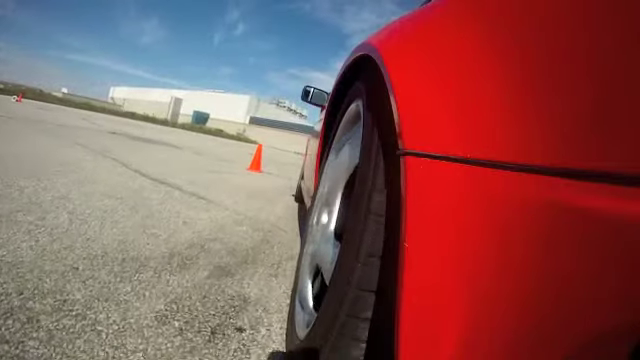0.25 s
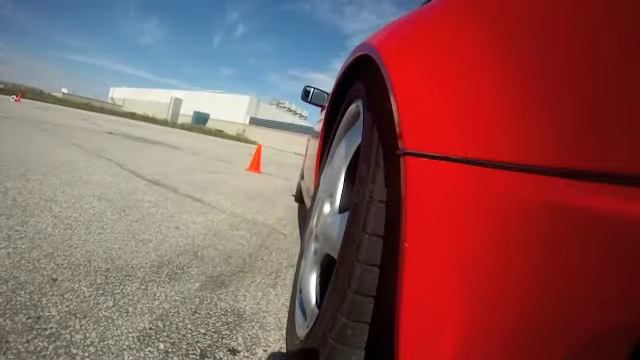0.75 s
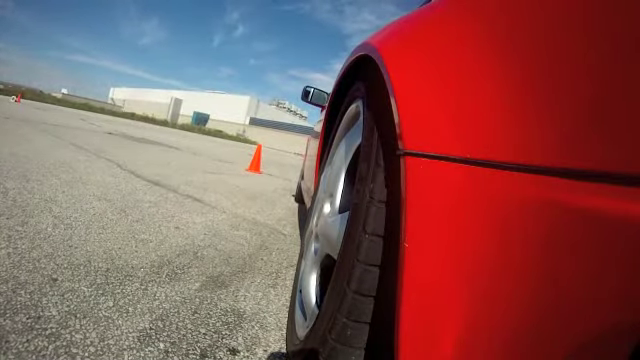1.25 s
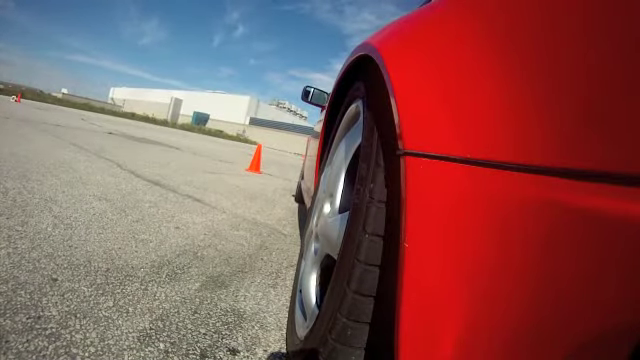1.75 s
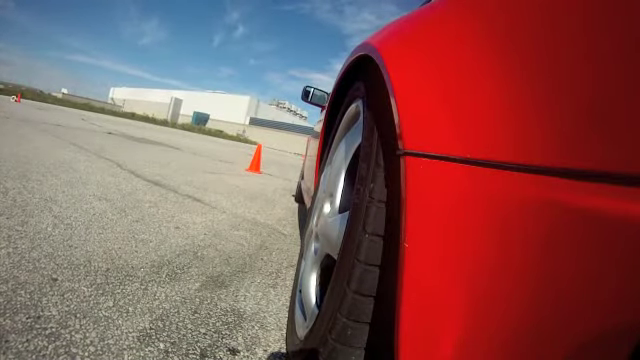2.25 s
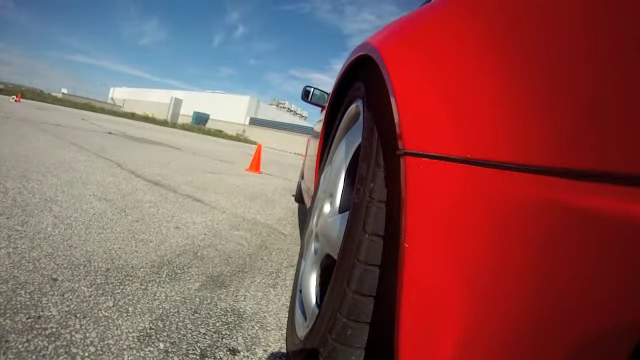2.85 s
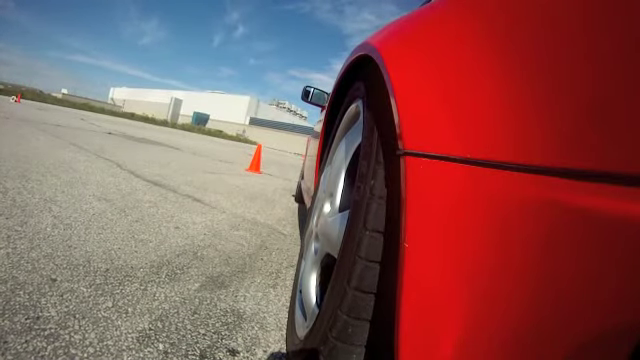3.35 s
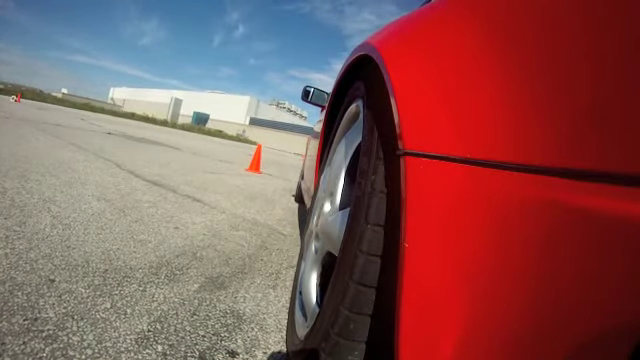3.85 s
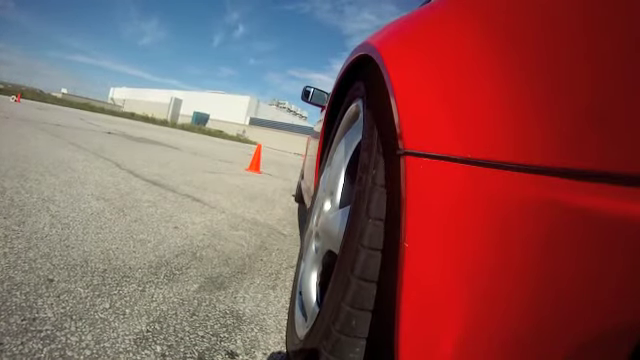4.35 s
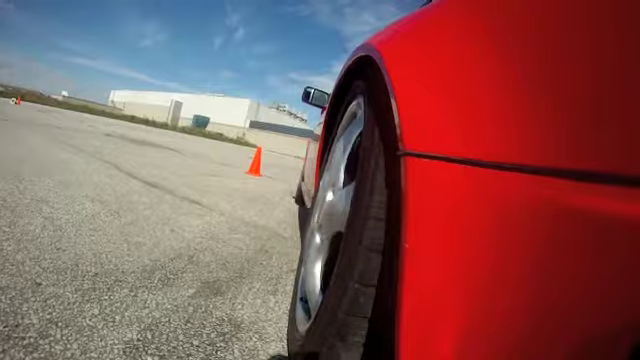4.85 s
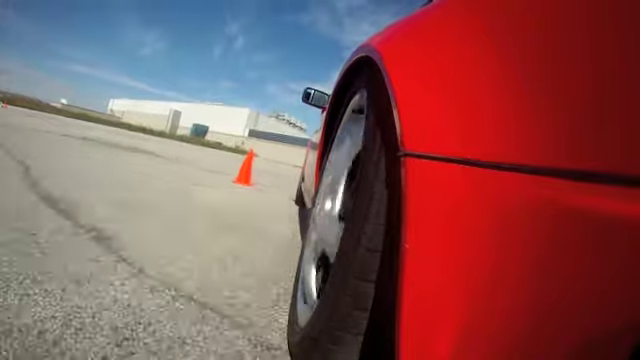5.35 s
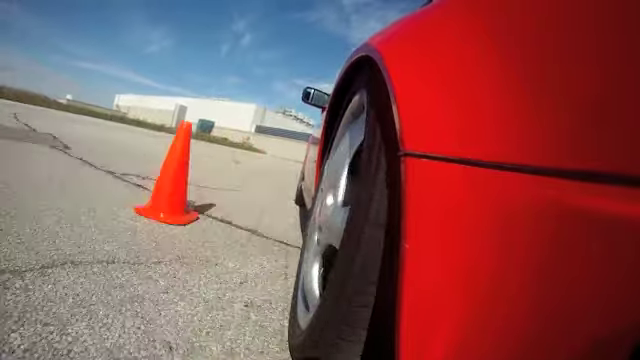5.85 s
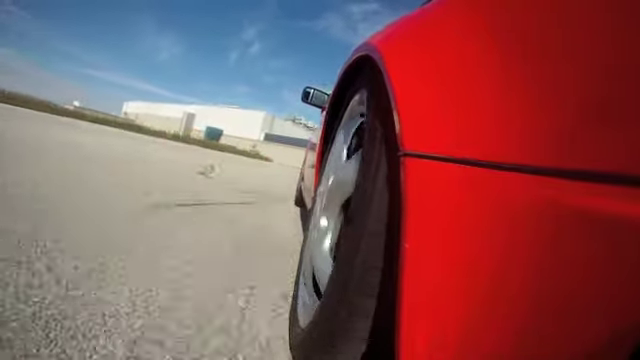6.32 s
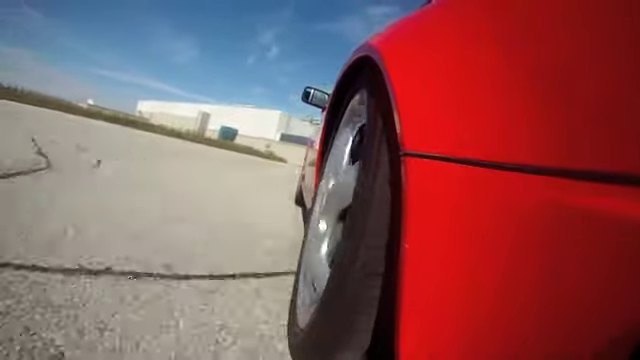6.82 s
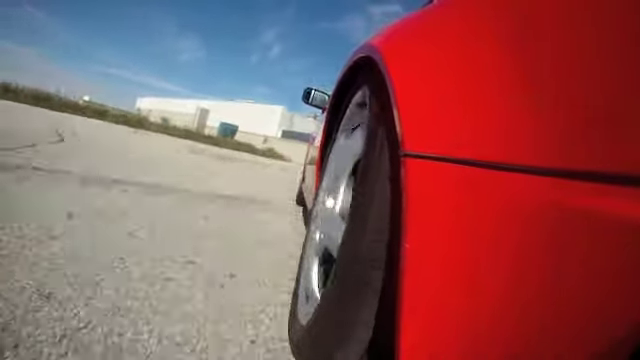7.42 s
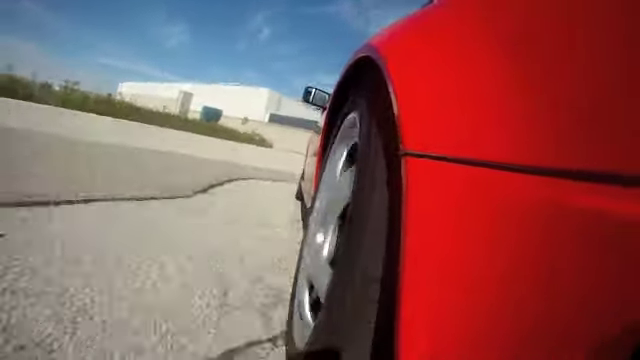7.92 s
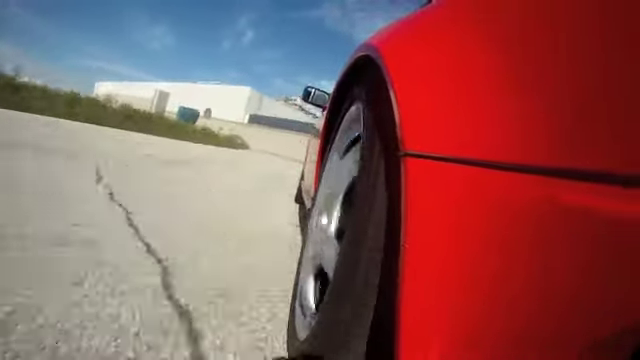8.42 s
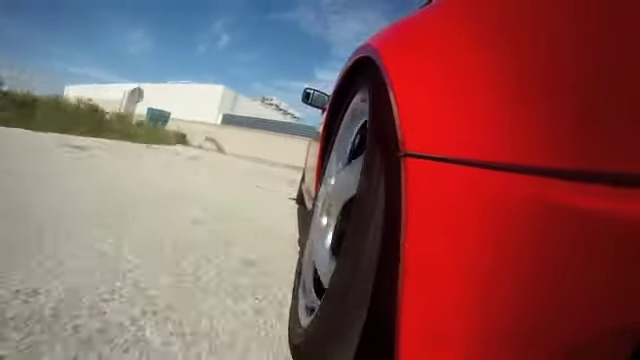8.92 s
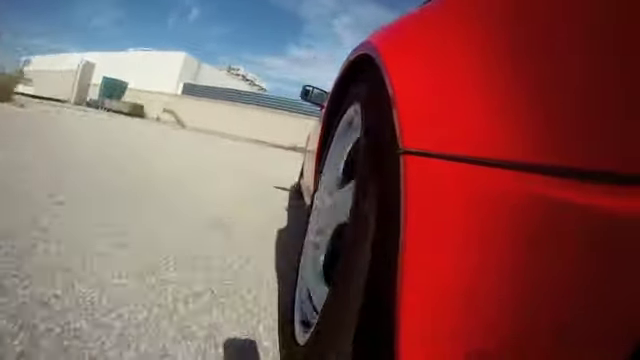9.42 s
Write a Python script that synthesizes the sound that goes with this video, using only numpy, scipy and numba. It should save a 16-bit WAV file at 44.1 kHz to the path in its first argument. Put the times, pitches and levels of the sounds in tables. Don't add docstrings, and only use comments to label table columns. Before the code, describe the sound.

From 0 to 3.5 s a six-cylinder car engine idles steadily, a low lumpy hum under constant valve and fan hiss, with a faint thump near 1.2 s. Around 3.6 to 4.2 s a first throttle blip swells and falls with several heavy muffler thumps; a second, with the hardest thump, comes at 4.4 s. At 4.8 s the engine surges and the car pulls away with a low growl, sags near 5.7 s, then climbs steadily from 6 s into a loud rasping, singing roar with fan whine, peaking about 7.7 s. It lifts off, pitch falling fast with hiss and boom until 8.4 s. Paving knocks and loose-panel rattle come at 5.1, 6.2, 8.3 to 8.4, 9.3 and 9.6 s. From 8.5 s it pulls again at middle revs, easing rougher after 9.2 s. Close, sealed body-mounted microphone outdoors: muffled, compressed, with gritty mirrored treble.

```python
import sys
import numpy as np
from scipy import signal
from scipy.fft import rfft, irfft, next_fast_len
from scipy.io import wavfile
from scipy.ndimage import uniform_filter1d, map_coordinates
from numba import njit

SR = 44100
rng = np.random.default_rng(int(sys.argv[2]) if len(sys.argv) > 2 else 0)


def gain_from_db(level_db):
    decades = np.asarray(level_db, float) / 20
    return 10 ** decades


def unload_wav(signal):
    wavfile.write(
        sys.argv[1],
        SR,
        np.round(np.clip(np.atleast_2d(signal).T, -1, 1) * 32767).astype(np.int16),
    )


N = 426888
TIME = np.arange(N) / SR


def unit(x):
    return x / np.sqrt(np.mean(x ** 2) + 1e-20)


def curves(rows):
    seconds, *columns = np.transpose(rows)
    return [np.interp(TIME, seconds, column) for column in columns]


def wobble(rate):
    coarse = np.arange(0, N + 64, 64)
    knots = rng.standard_normal(int(N * rate / SR) + 4)
    return np.interp(np.arange(N), coarse, map_coordinates(knots, [coarse * rate / SR]))


def filtered(x, response):
    size = next_fast_len(N + SR // 2)
    return irfft(rfft(x, size) * response(np.fft.rfftfreq(size, 1 / SR)), size)[:N]


def noise(spectrum):
    points_hz, db = np.transpose(spectrum)
    colour = lambda hz: gain_from_db(np.interp(np.log(hz + 1), np.log(points_hz), db))
    return unit(filtered(rng.standard_normal(N), colour))


def ringing(x, modes, soft_hz):
    def body(f):
        total = 0
        for k, (centre, width, db) in enumerate(modes):
            total = total + (-1) ** k * gain_from_db(db) * 1j * f * width / (centre ** 2 - f * f + 1j * f * width)
        return total / (1 + 1j * f / soft_hz) ** 2
    return filtered(x, body)


def levelled(x, seconds):
    return x / np.sqrt(np.abs(uniform_filter1d(x ** 2, int(seconds * SR))) + 1e-20)


def blows(rows, db):
    return np.bincount(np.round(np.array(rows)[:, 0] * SR).astype(int), gain_from_db(db), N)


def patchy(x, depth_db):
    z = signal.stft(x, nperseg=512)[2]
    field = uniform_filter1d(rng.standard_normal(z.shape), size=4, axis=0)
    field = uniform_filter1d(field, size=16, axis=1)
    return signal.istft(z * gain_from_db(depth_db * unit(field)), nperseg=512)[1][:N]


def mapped(on, off, speed_hz, pedal):
    def read(rows):
        speeds, *columns = np.transpose(rows)
        return np.array([np.interp(speed_hz, speeds, column) for column in columns])
    return pedal * read(on) + (1 - pedal) * read(off)


# time in seconds, engine cycles a second.
ENGINE_SPEED = [(0, 8.25), (2.3, 8.45), (3.45, 8.25), (3.69, 10.85), (4.23, 8.68), (4.41, 11.3),
                (4.83, 19.45), (5.25, 17.93), (5.45, 17.77), (5.75, 15.04), (5.95, 19.1), (6.65, 28.7),
                (7.5, 42.3), (7.7, 48.6), (8.0, 39.2), (8.45, 28.3), (8.8, 27.6), (9.68, 26.1)]
# time in seconds, pedal from 0 to 1.
PEDAL_POSITION = [(0, 0.46), (.3, 0.38), (2.0, 0.27), (2.25, 0), (2.7, 0.27), (4.4, 0.63), (4.9, 0.75),
                  (5.3, 1), (5.75, 0.58), (6.1, 0.89), (7.72, 0.9), (7.87, 0), (8.2, 0.51), (8.5, 0.55),
                  (8.65, 0.84), (9.0, 0.92), (9.2, 0.48), (9.68, 0.43)]
# start in seconds, surge in cycles a second, rise in seconds,
# fall in seconds, how far the throttle shuts in the fall from 0 to 1.
STABS = [
    (3.75, 9, .12, .36, 1),
    (4.41, 9.6, .18, .24, .8),
    (4.83, 2.5, .12, .25, 0),
    (8.45, -1.5, .2, .11, 0),
]


def driver():
    speed_hz, = curves(ENGINE_SPEED)
    pedal, = curves(PEDAL_POSITION)
    for start, surge, rise, fall, shut in STABS:
        up = np.clip((TIME - start) / rise, 0, 1)
        down = np.clip((TIME - start - rise) / fall, 0, 1)
        speed_hz = speed_hz + surge * (np.sin(np.pi / 2 * up) - down)
        pedal = np.where((up > 0) & (up < 1) & (surge > 0), .84, pedal)
        pedal = pedal * np.where((down > 0) & (down < 1), 1 - shut, 1)
    flywheel_s, foot_s = .07, .05
    speed_hz = uniform_filter1d(speed_hz, size=int(flywheel_s * SR))
    return speed_hz, np.clip(uniform_filter1d(pedal, size=int(foot_s * SR)), 0, 1)


def slowing(speed_hz):
    return np.clip(-uniform_filter1d(np.gradient(speed_hz) * SR, size=4000) / 22, 0, 1)


def firings(cycles, rough, cylinders):
    count = np.arange(1, int(6 * cycles[-1]))
    size, late = np.array(cylinders)[count % 6].T
    late_chance, size_chance = rng.standard_normal((2, len(count)))
    rough = rough[np.searchsorted(6 * cycles, count)]
    at = np.searchsorted(6 * cycles, count + late + 0.13 * rough * late_chance)
    return np.bincount(np.minimum(at, N - 1), size * np.exp(rough * size_chance), N)


# time in seconds, size scatter of the firings, mix from idling (0) to pulling (1).
BURNING = [(0, .12, 0), (3.4, .12, 0), (3.7, .28, .3), (4.4, .22, .4), (4.9, .07, 1), (5.3, .04, 1),
           (5.8, .07, 1), (6.4, .06, 1), (7.6, .05, 1), (7.85, .16, 1), (8.5, .15, 1), (8.8, .07, 1),
           (9.05, .1, 1), (9.2, .28, .8), (9.68, .22, .8)]
IDLING = [(0.3, 0.2), (0.64, -0.138), (0.79, 0.093), (1.15, -0.196), (0.39, 0.001), (1.5, -0.2)]
UNDER_THROTTLE = [(0.98, 0.144), (0.56, -0.264), (0.86, 0.107), (-0.83, 0.058), (-0.76, 0.221),
                  (0.91, 0.255)]


def gas_pulses(cycles):
    rough, throttle = curves(BURNING)
    idling = firings(cycles, rough, IDLING)
    pulling = firings(cycles, rough, UNDER_THROTTLE)
    return (1 - throttle) * idling + throttle * pulling, rough, throttle


# cycles a second, firing tone in dB, bank tone in dB, body shake in dB.
TONES_PEDAL_DOWN = [(8.3, -15.5, -45, -17), (11.2, -10.5, -21, -24), (14.9, -29, -34, -44),
                    (18.3, -19, -24.5, -31), (20.4, -13.5, -24.5, -37.5), (26.8, -14.5, -24.5, -29.5),
                    (35.4, -17, -20, -37.5), (47, -17, -16.5, -31)]
# cycles a second, firing tone in dB, bank tone in dB, body shake in dB.
TONES_LIFTED = [(8.4, -24.5, -44, -29), (10.7, -31.5, -23, -23), (15, -16, -29, -23), (17.8, -32, -36, -27),
                (20.6, -41, -22, -14), (26, -32, -18, -11.5), (33.8, -44.5, -18.5, -20),
                (47, -29.5, -17.5, -26)]
# frequency in Hz, level in dB per Hz.
SHAKE_COLOUR = [(15, 0), (28, -13), (42, -1), (65, 0.5), (120, -3), (250, -17.5), (600, -29), (800, -105)]


def tones_and_shake(turn, speed_hz, pedal, throttle):
    firing_db, bank_db, shake_db = mapped(TONES_PEDAL_DOWN, TONES_LIFTED, speed_hz, pedal)
    beat = turn - .1 + .06 * wobble(8)
    tones = gain_from_db(firing_db + 3.5) * np.cos(6 * beat)
    overtones = gain_from_db(-6) * np.cos(9 * beat) + gain_from_db(-12) * np.cos(12 * beat)
    tones += (1 - throttle) * gain_from_db(firing_db) * overtones
    tones += gain_from_db(bank_db + 3.5) * np.sin(3 * turn + .2 * wobble(6))
    second_db = bank_db - 14 + 12 * slowing(speed_hz)
    tones += throttle * gain_from_db(second_db) * np.sin(4 * turn + .3 * wobble(6))
    return tones + gain_from_db(shake_db + 2 * wobble(7)) * noise(SHAKE_COLOUR)


def alternator(throttle):
    return (1 - throttle) * gain_from_db(-55) * np.sin(2 * np.pi * 945 * TIME + 1.3 * wobble(15))


# frequency in Hz, width in Hz, level in dB.
MUFFLER_MODES = [(79.4, 4.7, -5.5), (128.8, 26.8, 4.5), (159.1, 30.2, 4.5), (184.6, 14.4, -6)]


def muffler_boom(pulses, boom_db):
    return gain_from_db(boom_db - 4.0) * levelled(ringing(pulses, MUFFLER_MODES, soft_hz=407), 0.53)


# frequency in Hz, width in Hz, level in dB.
HEADER_MODES = [(178.7, 55, 6), (266.4, 14.6, 11.5), (316, 37, 1.5)]


def header_pipes(pulses, header_db, throttle):
    level = gain_from_db(header_db - 9.0 + 1.8 * throttle)
    return level * levelled(ringing(pulses, HEADER_MODES, soft_hz=590), 0.19)


# frequency in Hz, width in Hz, level in dB.
SHELL_MODES = [(372.6, 134, -3.5), (431, 42, 8), (486, 58.8, 8.5), (569.5, 88, 2.5), (633, 34.7, -4.5)]


def shell_rasp(shaken, rasp_db, throttle):
    level = gain_from_db(rasp_db - 0.18 - 2.5 * throttle)
    return level * levelled(ringing(shaken, SHELL_MODES, soft_hz=810), 0.099)


# time in seconds, swell in dB, length in seconds.
SLACK = [
    (4.495, 11, 0.061),
    (4.978, 4, .1),
    (5.99, 10.5, .12),
    (8.046, 5, .12),
]
# frequency in Hz, width in Hz, level in dB.
PANEL_MODES = [(979, 91, 12), (1183, 90, 2), (1397, 44, 6)]


def panel_buzz(shaken, buzz_db):
    for start, swell_db, length in SLACK:
        buzz_db = buzz_db + swell_db * np.exp(-((TIME - start) / length) ** 2)
    driven = ringing(shaken, [(1300, 660, 0)], soft_hz=4000)
    return gain_from_db(buzz_db) * levelled(ringing(driven, PANEL_MODES, soft_hz=3030), 0.34)


# frequency in Hz, width in Hz, level in dB.
CASE_MODES = [(1640, 150, 1.5), (2490, 260, -1), (3050, 260, 1)]


def case_ring(shaken, machinery_db, speed_hz):
    level_db = machinery_db - 5 + 0.48 * (speed_hz - 39)
    return gain_from_db(level_db) * levelled(ringing(shaken, CASE_MODES, soft_hz=8000), 0.27)


# frequency in Hz, level in dB per Hz.
HISS_COLOUR = [(380, -26), (650, -7), (700, -2.5), (820, -11), (926, -5.5), (1060, -7.5), (1230, -4.5),
               (1460, -4), (1740, -7), (2460, -4), (2960, -2), (3630, -7), (4290, -15.5), (5080, -8.5),
               (6000, -26.5), (7800, -67), (13200, -120)]


def valve_hiss(turn, machinery_db):
    gate = 1 + .2 * np.cos(6 * turn) + .08 * np.cos(2 * turn + 1) + .12 * np.cos(turn)
    flutter_db = .7 * wobble(5.5)
    hiss = unit(gate * patchy(noise(HISS_COLOUR), depth_db=1.0))
    return gain_from_db(machinery_db + 2.5 + flutter_db) * hiss


# time in seconds, peak in dB.
HEAVY_FIRINGS = [(1.21, -22), (3.546, -20), (3.595, -2.5), (3.658, -9), (3.72, -2), (3.741, -5),
                 (3.847, -1), (4.047, -4), (4.204, -4), (4.406, 9)]


def thumps():
    pushes = blows(HEAVY_FIRINGS, np.array(HEAVY_FIRINGS)[:, 1] + 43)
    return ringing(pushes, [(111, 38, 0)], soft_hz=169)


def fan_whine(turn, machinery_db, speed_hz, throttle):
    level_db = machinery_db - 6.5 - 9 * slowing(speed_hz) + 3 * wobble(4)
    blades = np.sin(28 * turn + .7 * wobble(12)) + .7 * np.sin(34 * turn + wobble(12))
    strength = np.interp(speed_hz, [28, 32.8, 43, 46], [0, 0.28, 1.8, 0.39])
    return throttle * gain_from_db(level_db) * blades * strength


# frequency in Hz, width in Hz, level in dB.
TAILPIPE_MODES = [(190.6, 14, 9.5), (221, 52, -1.5)]


def tailpipe_boom(pulses, boom_db, speed_hz, throttle):
    level = throttle * gain_from_db(boom_db - 4.0 - 0.86 * np.abs(speed_hz - 18))
    return level * levelled(ringing(pulses, TAILPIPE_MODES, soft_hz=615), 0.2)


SINGING_ORDERS = [9, 13, 15, 16, 18, 19, 22, 25, 28, 30, 31, 32, 33]
SINGING_LEVELS = [2.5, -3, -3.5, -7, -3.5, -6, -8, -6.5, -4.5, -5, -4, -6, -5]
# frequency in Hz, width in Hz, level in dB.
SINGING_MODES = [(575, 207, 1)]


def shell_singing(turn, speed_hz, pedal, rasp_db, throttle):
    song = np.zeros(N)
    for order, db in zip(SINGING_ORDERS, SINGING_LEVELS):
        song += gain_from_db(db) * np.sin(order * turn + order ** 2 + .6 * wobble(5))
    song *= gain_from_db(-9 * (1.5 - pedal) + 3 * (speed_hz < 19.5))
    song = filtered(song, lambda hz: 1 / (1 + (hz / 640) ** 20))
    return throttle * gain_from_db(rasp_db + 2.0) * ringing(song, SINGING_MODES, soft_hz=930)


# time in seconds, peak in dB, panel ring in dB.
JOINTS = [(5.07, -18, -31), (5.167, -24, -30), (6.089, -23, -24), (6.277, -11, -41), (8.306, -15, -25),
          (8.339, -12.5, -23), (8.372, -12.5, -22), (8.405, -18.5, -16), (8.44, -17.5, -13.5),
          (9.222, -16.5, -24), (9.306, -19, -8.5), (9.61, -16, -18)]


def knocks():
    knock_db, ring_db = np.array(JOINTS)[:, 1:].T
    knock = ringing(blows(JOINTS, knock_db + 43.0), SHELL_MODES, soft_hz=1530)
    return knock + ringing(blows(JOINTS, knock_db + ring_db + 42.5), PANEL_MODES, soft_hz=3000)


# cycles a second, muffler boom in dB, header pipes in dB, shell rasp in dB, panel buzz in dB.
PIPES_PEDAL_DOWN = [(8.45, -13, -39, -30.5, -50), (10.5, -21, -28, -38, -56), (16.2, -14, -21, -22.5, -47),
                    (16.67, -15, -36.5, -17.5, -41.5), (20.4, -19.5, -24, -18.5, -45),
                    (26.9, -34.5, -14.5, -21.5, -44), (35.6, -64, -13.5, -16.5, -36),
                    (44.5, -30, -21, -18, -40)]
# cycles a second, muffler boom in dB, header pipes in dB, shell rasp in dB,
# panel buzz in dB.
PIPES_LIFTED = [(8.3, -20, -78, -36, -70.5), (11, -15.5, -57, -25.5, -83), (15, -31, -18, -28.5, -84),
                (18.3, -22, -46, -32.5, -69), (22.1, -22.5, -45, -30, -51), (26, -8.5, -40, -28, -40.5),
                (35, -3.5, -36.5, -25.5, -35), (46.2, -27, -9.5, -17, -42)]
# time in seconds, level in dB.
MACHINERY_LEVEL = [(0.0, -39), (0.05, -40), (2.42, -42.5), (2.67, -41), (3.64, -42), (3.8, -44),
                   (3.96, -38), (4.39, -39), (4.42, -41), (4.66, -36.5), (5.77, -42.5), (5.96, -37),
                   (6.47, -40), (7.68, -29.5), (8.68, -34.5), (8.9, -40), (9.27, -35), (9.68, -35.5)]


def engine():
    speed_hz, pedal = driver()
    cycles = np.cumsum(speed_hz) / SR
    turn = 2 * np.pi * cycles
    pulses, rough, throttle = gas_pulses(cycles)
    boom_db, header_db, rasp_db, buzz_db = mapped(PIPES_PEDAL_DOWN, PIPES_LIFTED, speed_hz, pedal)
    machinery_db, = curves(MACHINERY_LEVEL)
    shaken = levelled(pulses, .3) + (7 - 3 * throttle) * rough * rng.standard_normal(N)
    sound = tones_and_shake(turn, speed_hz, pedal, throttle) + alternator(throttle)
    sound += muffler_boom(pulses, boom_db)
    sound += header_pipes(pulses, header_db, throttle)
    sound += shell_rasp(shaken, rasp_db, throttle)
    sound += panel_buzz(shaken, buzz_db)
    sound += case_ring(shaken, machinery_db, speed_hz)
    sound += valve_hiss(turn, machinery_db)
    sound += fan_whine(turn, machinery_db, speed_hz, throttle)
    sound += tailpipe_boom(pulses, boom_db, speed_hz, throttle)
    return sound + shell_singing(turn, speed_hz, pedal, rasp_db, throttle)


def scene():
    return (engine() + thumps() + knocks())[None]


@njit
def recover(gain, step):
    out = gain.copy()
    for i in range(1, len(out)):
        out[i] = min(gain[i], out[i - 1] + step * (1 - out[i - 1]))
    return out


def band_limit(x):
    return signal.sosfilt(signal.butter(12, 16010, fs=SR, output="sos"), x)


def record(dry):
    needed = np.minimum(1, gain_from_db(-8) / (np.abs(dry[0]) + 1e-9)) ** .9
    gain = recover(needed, 1 / (.1 * SR))
    gain = uniform_filter1d(gain, size=180, origin=89)
    slow = signal.resample_poly(dry[0] * gain * gain_from_db(1.5), 40, 147)
    held = signal.resample_poly(np.repeat(slow, 4), 147, 160)[:N]
    held = filtered(held, lambda hz: hz < 15330)
    return band_limit(held[None])


dry = scene()
out = record(dry)
unload_wav(out)
```